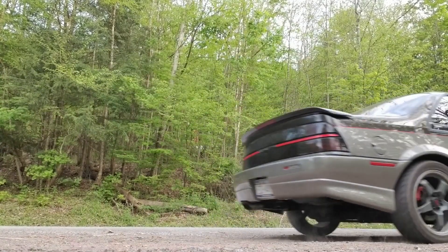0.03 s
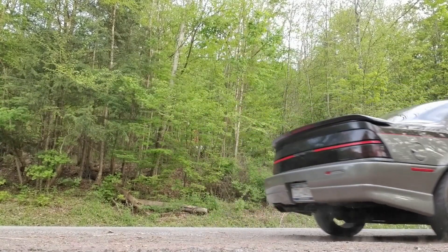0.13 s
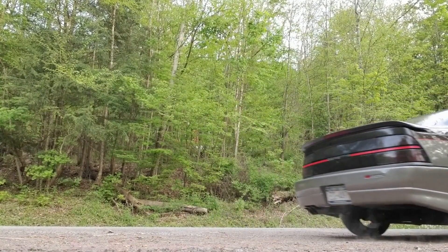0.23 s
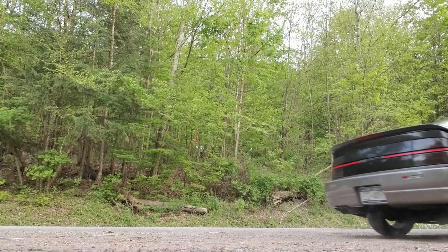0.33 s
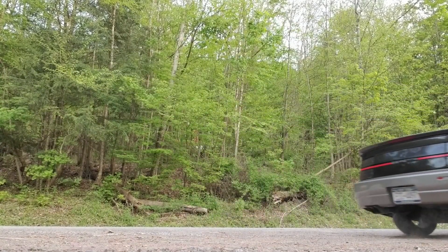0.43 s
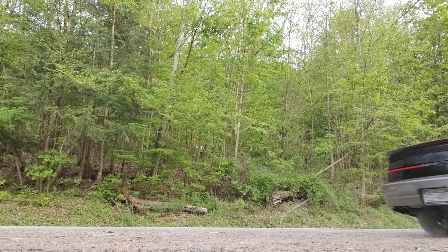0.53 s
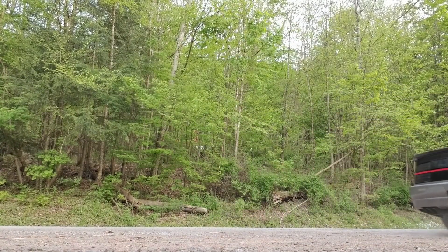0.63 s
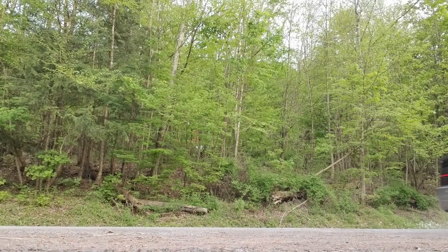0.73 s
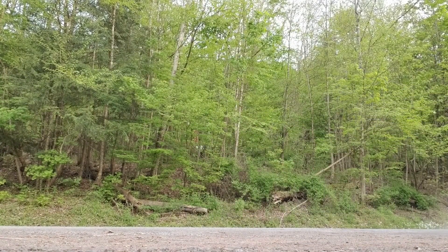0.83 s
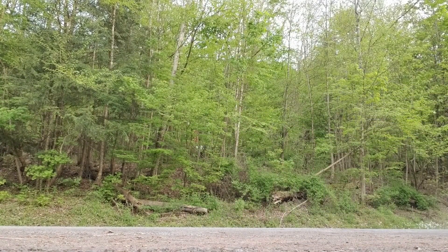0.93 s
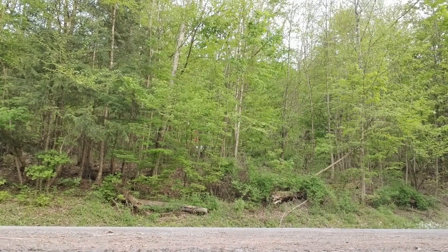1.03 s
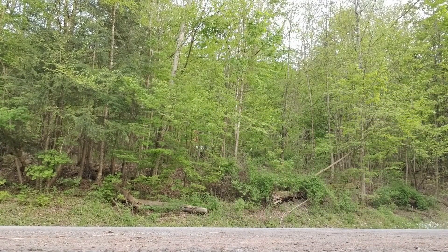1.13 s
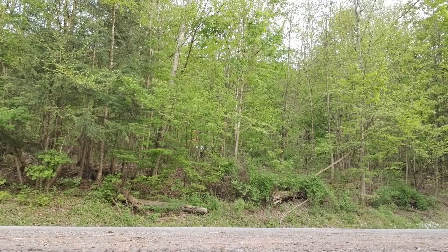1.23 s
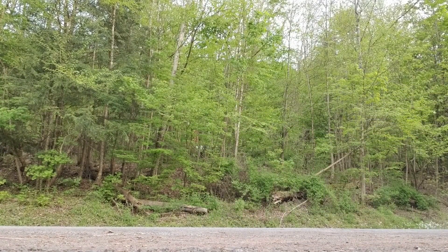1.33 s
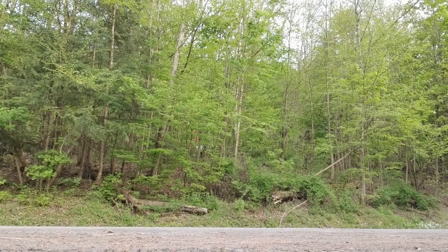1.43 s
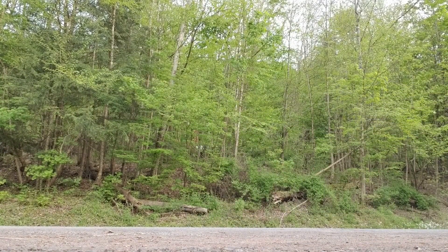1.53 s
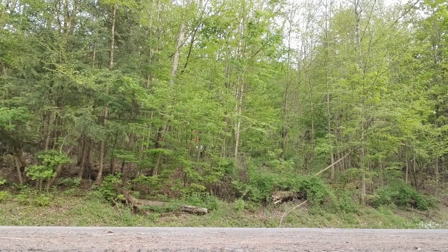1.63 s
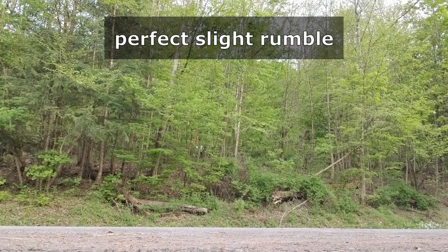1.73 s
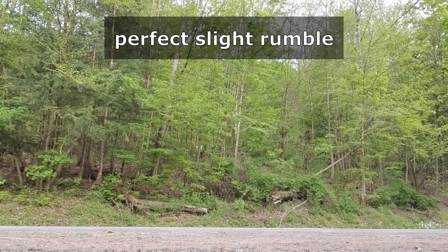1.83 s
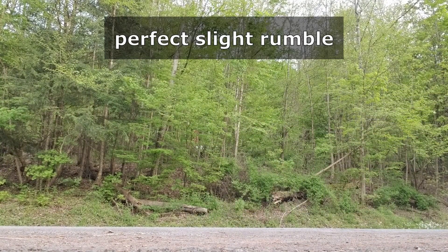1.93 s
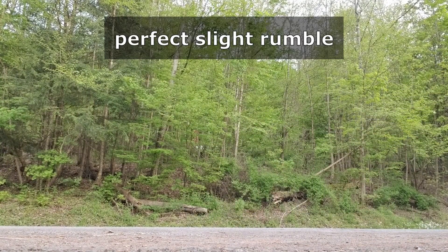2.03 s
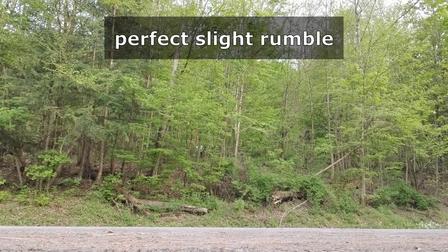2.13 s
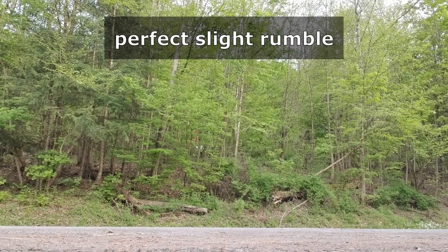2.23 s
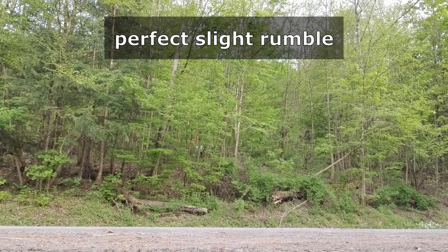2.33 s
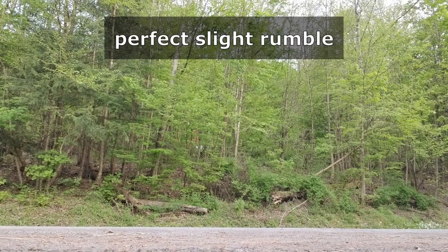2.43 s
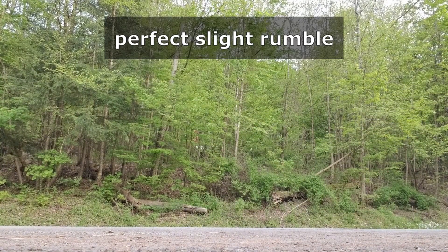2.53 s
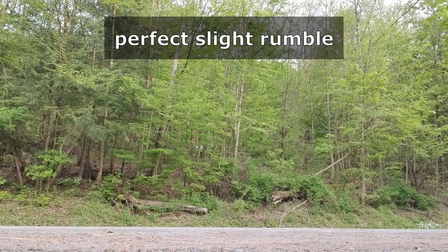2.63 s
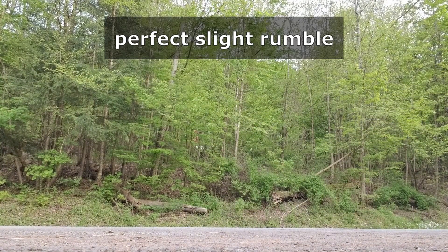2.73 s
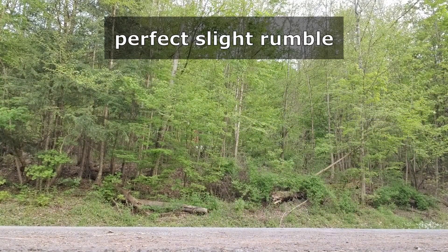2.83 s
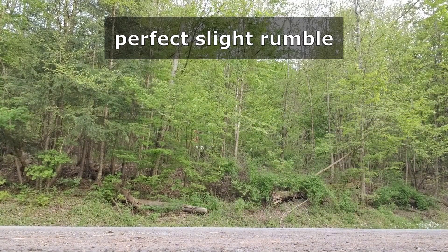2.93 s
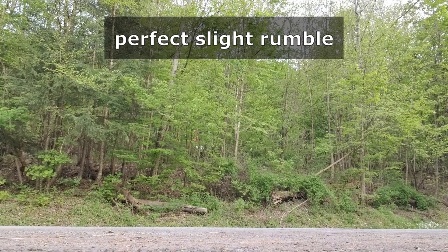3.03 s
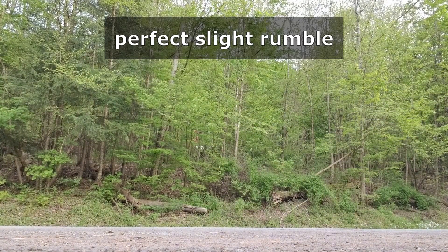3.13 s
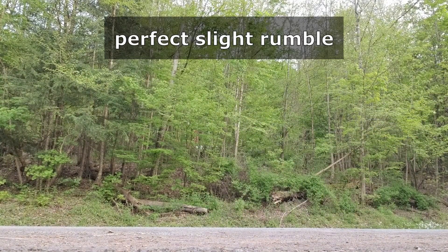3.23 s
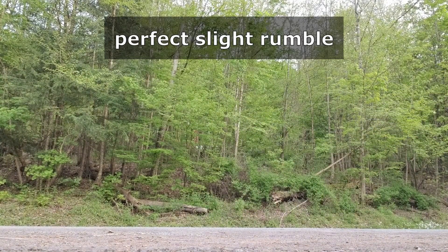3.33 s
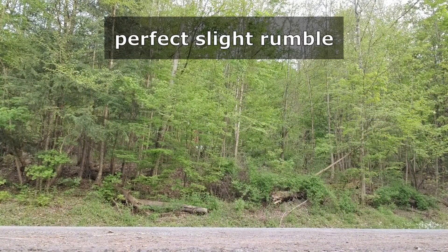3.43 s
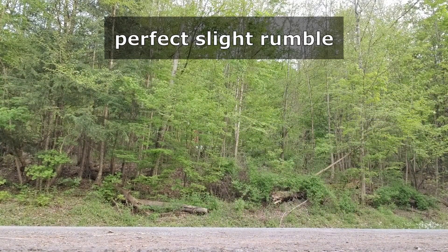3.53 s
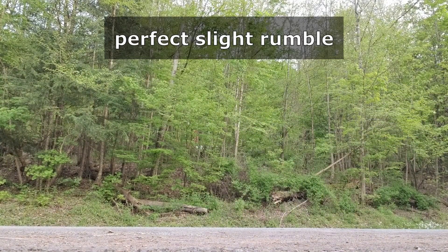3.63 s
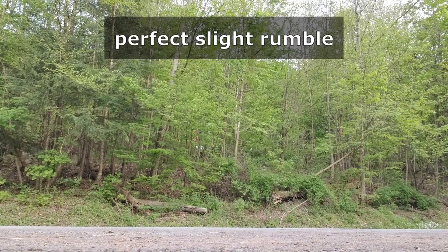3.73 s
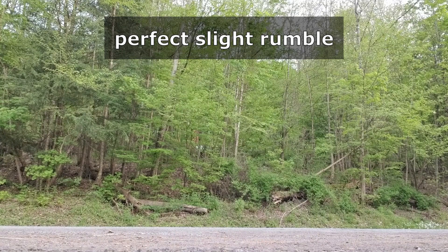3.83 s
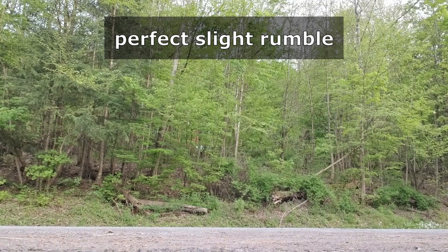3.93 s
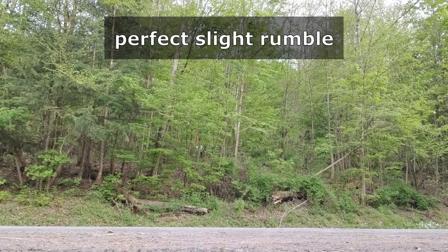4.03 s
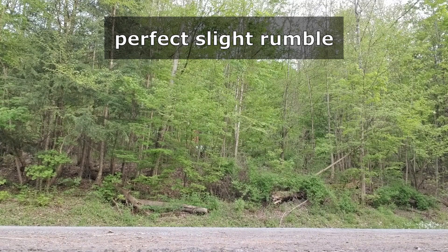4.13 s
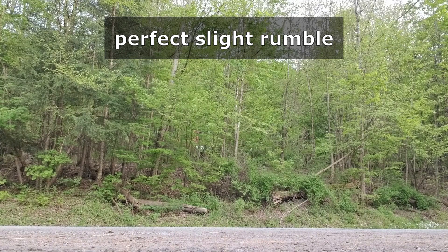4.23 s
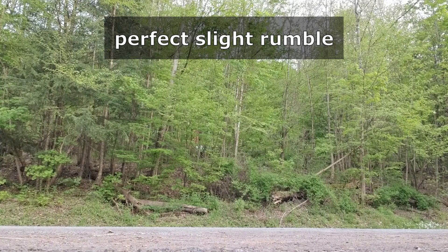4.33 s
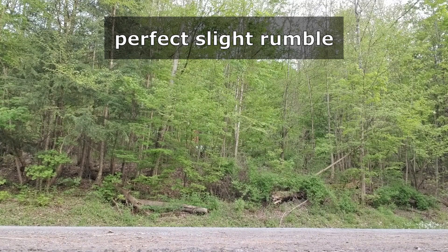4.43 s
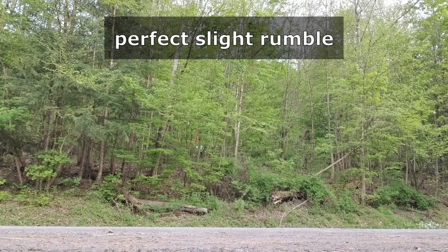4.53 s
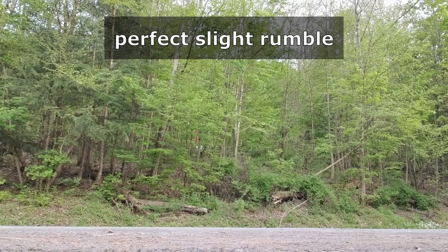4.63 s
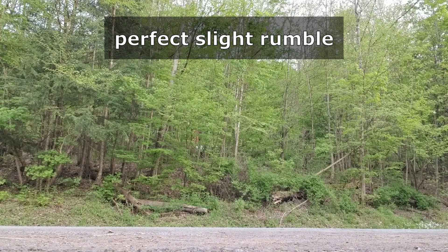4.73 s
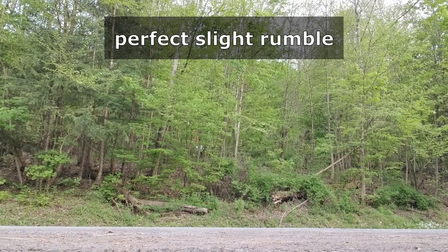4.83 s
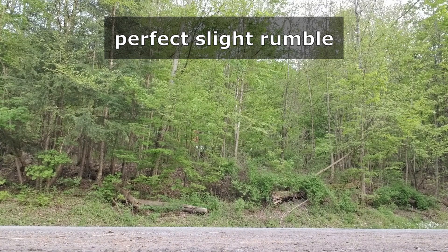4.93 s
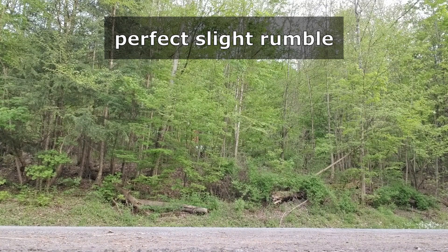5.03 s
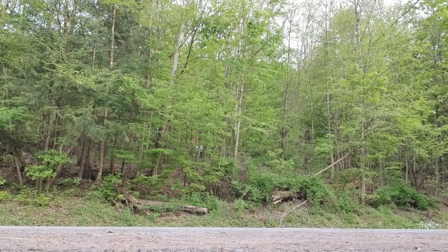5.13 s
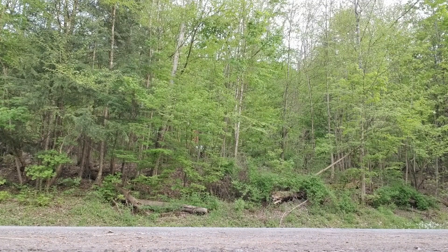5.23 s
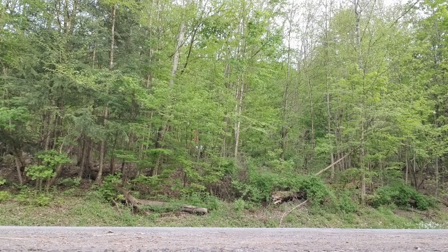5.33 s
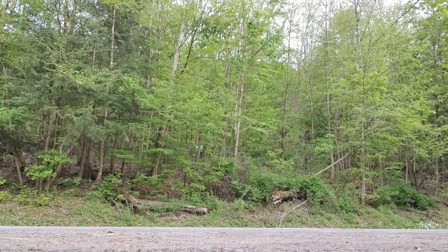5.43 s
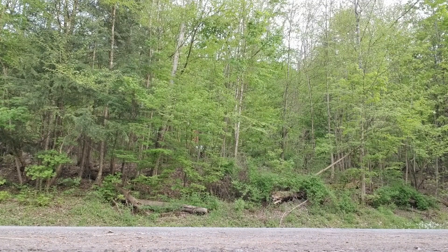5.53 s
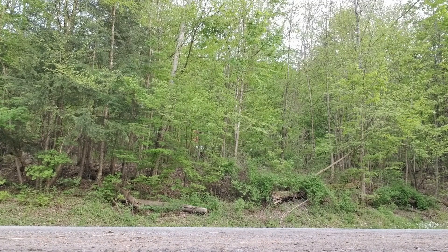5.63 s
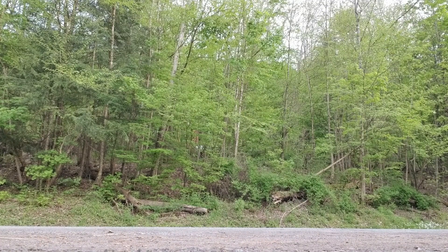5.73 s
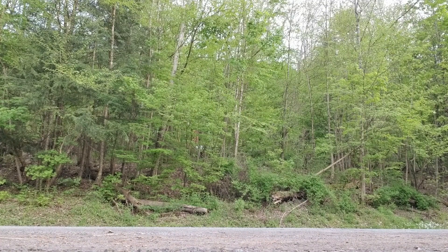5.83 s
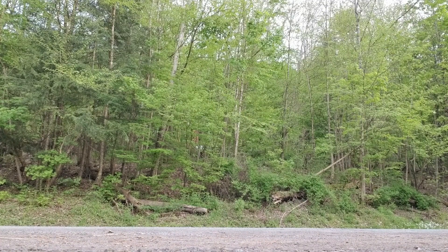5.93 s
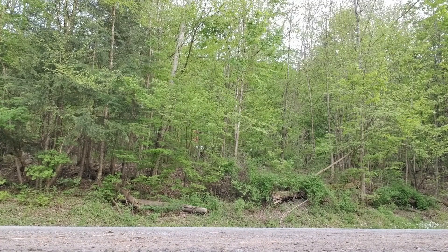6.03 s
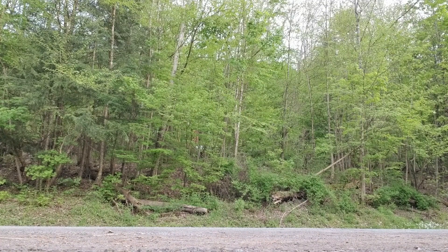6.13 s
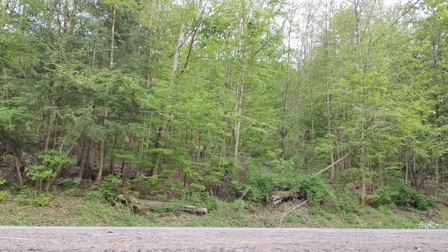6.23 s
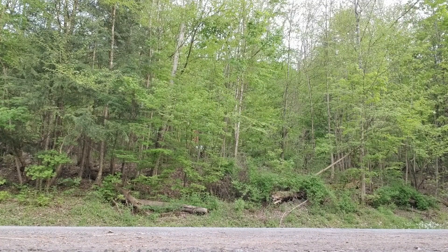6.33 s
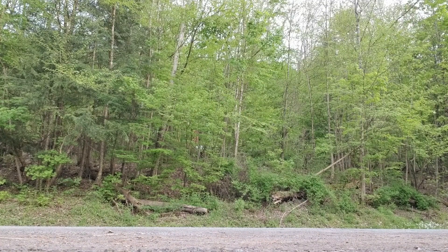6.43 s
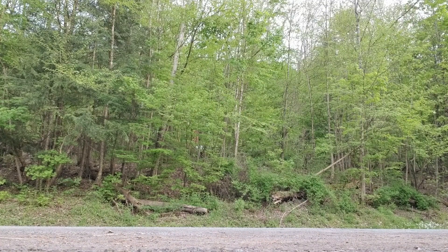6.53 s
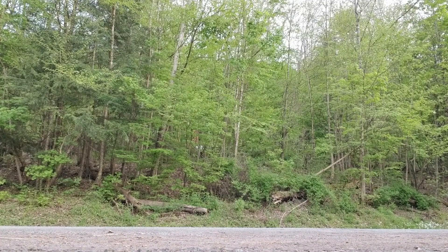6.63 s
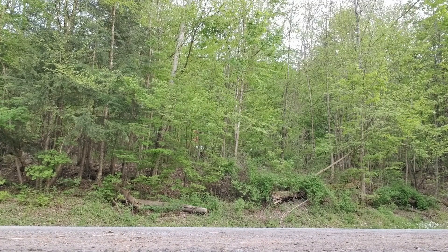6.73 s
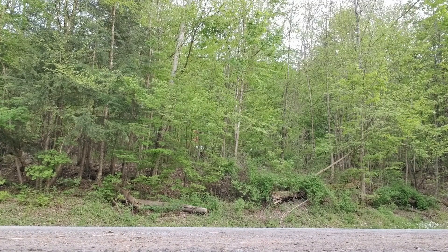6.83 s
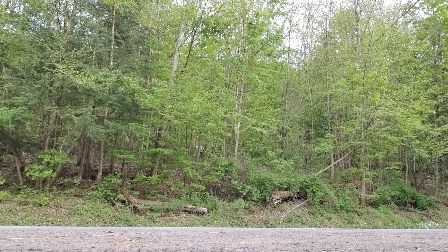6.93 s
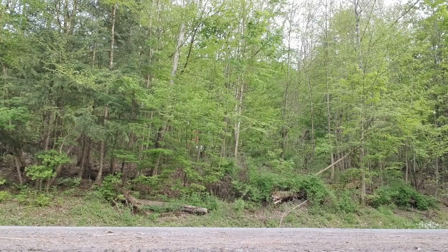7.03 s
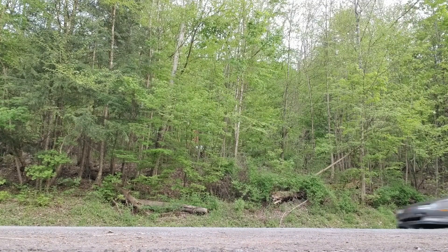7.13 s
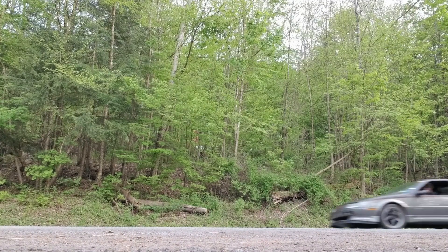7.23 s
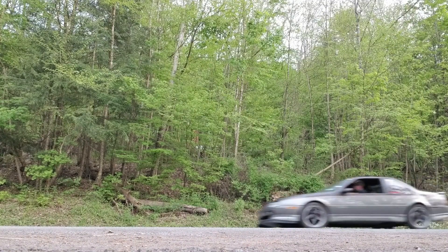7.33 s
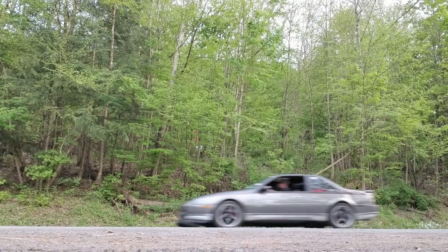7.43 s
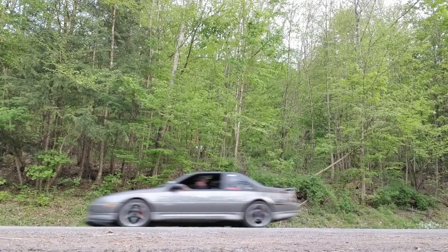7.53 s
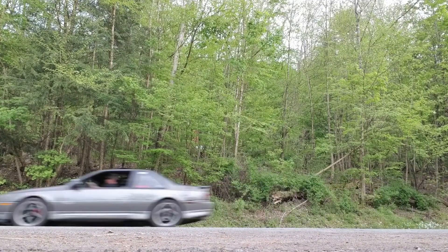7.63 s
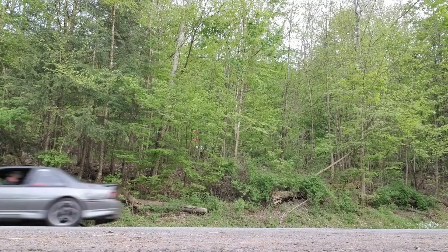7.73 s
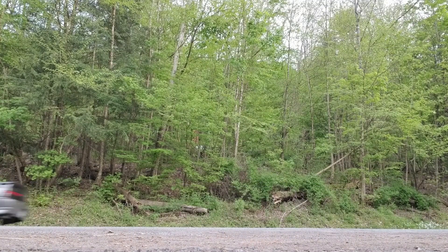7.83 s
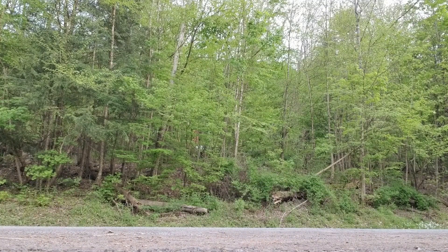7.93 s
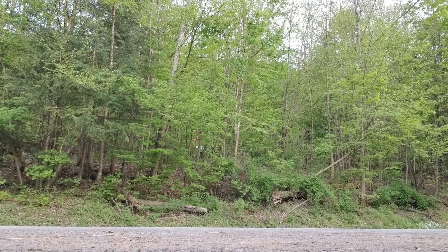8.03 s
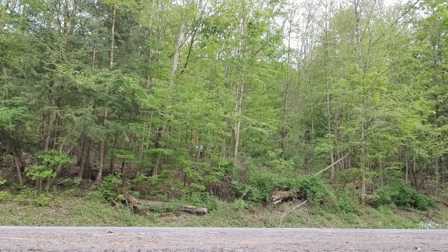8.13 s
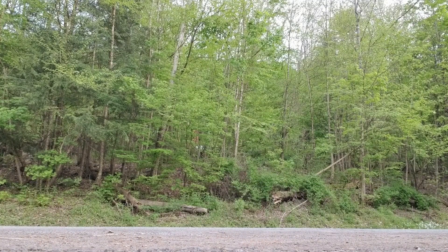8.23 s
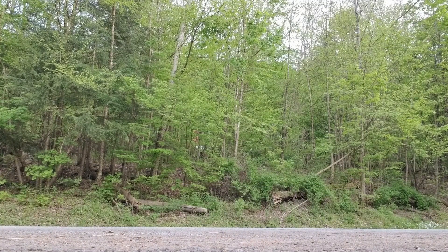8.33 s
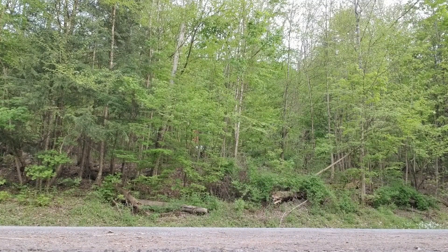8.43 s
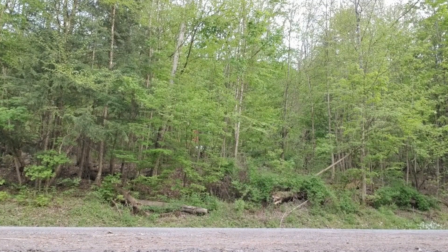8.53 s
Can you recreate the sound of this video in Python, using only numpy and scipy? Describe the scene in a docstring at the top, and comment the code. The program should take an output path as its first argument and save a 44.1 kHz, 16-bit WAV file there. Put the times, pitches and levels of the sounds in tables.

```python
"""Beside a wooded road, a V6 car with a loud exhaust pulls away, shifts up and recedes.
After an abrupt cut it approaches through another gear change and drives past.
Engine orders are cosines swept through muffler and pipe resonances; puffs of gas pulse the rumble.
Shaped noise gives tyre roar, hiss, jet, fizz and a faint high hiss; a fluttering cosine gives the squeal.
Two spaced microphone ports place the passing car, from left to right, by arrival time."""
import sys
import numpy as np
from scipy import signal
from scipy.fft import rfft, irfft, next_fast_len
from scipy.io import wavfile
from scipy.ndimage import uniform_filter1d, map_coordinates

SR = 44100
rng = np.random.default_rng(int(sys.argv[2]) if len(sys.argv) > 2 else 0)


def to_wav(sig):
    """Store sig (one row per channel, or 1-D mono) as 16-bit WAV at the path in sys.argv[1].

    Samples outside -1..1 are clipped; the rate is SR.
    """
    pcm = np.clip(np.atleast_2d(sig), -1, 1) * 32767
    pcm = np.round(pcm).astype(np.int16)
    wavfile.write(sys.argv[1], SR, pcm.T)  # frames by channels


N = 379255
TIME = np.arange(N) / SR
CUT_S = 5.136  # the first drive gives way to the second


def gain_of(db):
    """Decibels to amplitude."""
    return 10 ** (np.asarray(db) / 20)


def curve(table):
    """The value of a timed table at every sample."""
    s, value = np.transpose(table)
    return np.interp(TIME, s, value)


def read(points, hz):
    """A spectrum's value at hz, on a log-frequency axis."""
    f, value = np.transpose(points)
    return np.interp(np.log(hz + 1), np.log(f), value)


def swell(s, half_s, db):
    """A bell-shaped rise in dB around one moment."""
    return db * np.exp(-((TIME - s) / half_s) ** 2)


def cut(before, after):
    """The first drive up to the cut, then the second, joined by a very short crossfade."""
    first = uniform_filter1d((TIME < CUT_S) * 1., size=120)
    return first * before + (1 - first) * after


def wander(rate_hz):
    """Smooth random movement of rms 1, fading out above about rate_hz."""
    size = next_fast_len(N)
    hz = np.fft.rfftfreq(size, 1 / SR)
    x = irfft(rfft(rng.standard_normal(size)) * np.exp(-(hz / rate_hz) ** 2), size)[:N]
    return x / x.std()


def delayed(x, lag_s):
    """The sound x, late by a moving lag."""
    return map_coordinates(x, [np.arange(N) - lag_s * SR], order=3, mode="nearest")


# likeness of the two ports: [frequency_hz, likeness (0-1)]
PORT_LIKENESS = [(150, 0.94), (700, 0.99), (1100, 0.97), (2100, 0.84), (3000, 0.67), (4500, 0.13)]


def noise(spectrum, right_db):
    """Noise shaped in dB per Hz, alike at both ports in the bass and mostly unrelated in the treble."""
    size = next_fast_len(N)
    hz = np.fft.rfftfreq(size, 1 / SR)
    left, other = rfft(rng.standard_normal((2, size))) * np.sqrt(SR / 2)  # 0 dB per Hz
    same = np.clip(read(PORT_LIKENESS, hz), 0, 1)
    right = gain_of(right_db) * (same * left + np.sqrt(1 - same ** 2) * other)
    return irfft(np.array([left, right]) * gain_of(read(spectrum, hz)), size)[:, :N]


# each drive past the microphone: (level_with_mic_s, road_speed_m_per_s, lane_distance_m)
DRIVE_AWAY = (-0.94, 3.43, 4.29)
DRIVE_PAST = (7.442, 17.8, 6.7)


def place(drive, behind_m=0):
    """Distance in lane distances, and bearing from -1 (coming) to 1 (going), of a point on the car."""
    level_s, m_per_s, lane_m = drive
    along = (m_per_s * (TIME - level_s) - behind_m) / lane_m
    distance = np.hypot(1, along)
    return distance, along / distance


# the gear change of each drive: (shut_s, open_s)
GEAR_CHANGE_AWAY = (2.36, 2.95)
GEAR_CHANGE_PAST = (4.9, 5.39)
THROTTLE_S = 0.052  # travel time of the pedal


def throttle_shut():
    """1 while the foot is off the pedal for a gear change, else 0, with a ramp between."""
    changes = (GEAR_CHANGE_AWAY, GEAR_CHANGE_PAST)
    away, past = [np.minimum(TIME - shut_s, open_s - TIME) for shut_s, open_s in changes]
    return np.clip(np.where(TIME < CUT_S, away, past) / THROTTLE_S + .5, 0, 1)


def level(where, db, fall_db, shut_db, behind_db, ahead_db=0):
    """A source's dB at the roadside, from its distance, the throttle and the side of the car that is heard."""
    distance, bearing = where
    beam_db = np.where(bearing > 0, behind_db, ahead_db) * bearing ** 2
    return db - fall_db * np.log10(distance) + shut_db * throttle_shut() + beam_db


# crankshaft speed through first gear, the shift and second gear: [time_s, turns_per_s]
CRANK_AWAY = [(0.0, 33.5), (0.28, 39.3), (0.88, 48.4), (1.4, 55.4), (1.99, 61.4), (2.3, 63.5), (2.61, 62.5),
              (2.72, 59.9), (2.79, 52.7), (2.91, 39.4), (2.99, 36.2), (3.11, 40.6), (3.19, 39.0),
              (4.02, 47.2), (4.51, 51.9), (5.12, 57.3)]
# crankshaft speed as heard from the roadside, through a shift and the pass: [time_s, turns_per_s]
CRANK_PAST = [(5.13, 63.5), (5.3, 59.1), (5.48, 46.4), (5.62, 44.2), (6.5, 48.8), (7.0, 50.8), (7.5, 51.9),
              (8.1, 50.25), (8.6, 50.8)]


def crankshaft():
    """The steady crankshaft speed, and the turns counted at that speed with a slight unsteadiness."""
    speed = cut(curve(CRANK_AWAY), curve(CRANK_PAST))
    turns = np.cumsum(speed * (1 + 0.0025 * wander(rate_hz=12.7))) / SR
    return speed, turns


# bass resonances of the muffler, which the low orders sweep through: [frequency_hz, gain_db]
MUFFLER = [(34, -28), (50, -14), (62, -6.5), (76, -1.8), (97, -9), (125, -5), (155, -1), (190, -12),
           (262, -8), (288, 1), (320, -5.5)]
# standing waves of the exhaust pipe, which the overtones sweep through: [frequency_hz, gain_db]
PIPE_WAVES = [(110, -28), (155, -0.5), (210, -14), (255, -12.5), (290, -1), (370, -13), (440, -4),
              (480, 1.5), (550, -14), (800, -11)]
# load on the engine, which moves the whole exhaust note: [time_s, gain_db]
ENGINE_LOAD = [(0.0, -3.5), (0.25, -1), (0.7, -3), (1.3, -0.5), (2.2, -0.5), (3.0, -3.0), (3.65, 2.0),
               (4.4, -2.5), (5.13, -0.6), (5.3, -2.5), (5.5, -6), (6.2, 0.3)]
# the drone of the overtones swells briefly: [time_s, half_length_s, rise_db]
OVERTONE_SWELLS = [(0.55, 0.21, 5.5), (1.4, 0.28, 3.5), (4.74, .19, 5), (8.07, 0.21, 6.5)]
TAILPIPE_M = 1.4  # behind the middle of the car


def exhaust_note(speed, turns, drive, note, low_orders, overtones, rough, smear_rad, spread_rad):
    """Low orders and overtones that swell as they cross the resonances of muffler and pipe."""
    def angle(k):
        """Phase of order k: the muffler spreads out the bass of each pulse and leaves its edge sharp."""
        return 2 * np.pi * np.round(2 * k) / 2 * turns - spread_rad * min(k, 7) ** 2

    tailpipe = place(drive, TAILPIPE_M)
    *low_db, overtone_db = [level(tailpipe, *row) for row in note.values()]
    overtone_db = overtone_db + sum(swell(*row) for row in OVERTONE_SWELLS)
    out = np.zeros(N)
    for k, db in zip(low_orders, low_db):
        out += gain_of(db + read(MUFFLER, k * speed)) * np.cos(angle(k))
    for k, db in overtones:
        # echoes from the trees let each overtone's phase drift
        drift = smear_rad * wander(rate_hz=6.5)
        out += gain_of(overtone_db + db + read(PIPE_WAVES, k * speed)) * np.cos(angle(k) + drift)
    # no two firings are equally strong
    uneven = 1 + rough * wander(rate_hz=60)
    return np.sqrt(2) * gain_of(curve(ENGINE_LOAD)) * out * uneven


# exhaust note beside the car, before resonances, load and swells; one row per order, then the overtones
# pulling away: [level_db, fall_db_per_tenfold_distance, throttle_shut_db, from_behind_db]
ORDERS_AWAY = {"order 1": (-18, 20.5, 10.5, -4), "order 2": (-7, 20, -9, -9.5),
               "firing order 3": (-3.5, 23, -7, -5.5), "overtones": (-30.5, 27, -3, 0.5)}
# driving past: [level_db, fall_db_per_tenfold_distance, throttle_shut_db, from_behind_db, from_ahead_db]
ORDERS_PAST = {"one bank's order 1.5": (-16, 9, 15.5, -8, -18.5), "firing order 3": (-14, 30, -1, 7, 3.1),
               "order 6": (-21, 29.5, -22, 6, 8), "overtones": (-36.5, 26.5, -33, 11.5, 5.5)}
# overtones left by unequal cylinders: [multiple_of_crankshaft_speed, relative_db]
UNEQUAL_AWAY = [(3.5, -11.5), (4.0, 12.5), (5.0, 7.5), (6.0, 9.5), (7.0, 0.0), (8.0, 6.5), (9.0, 1.5),
                (10.0, 3), (11.0, -8.5), (12.0, -0.5), (13.0, -6.5)]
UNEQUAL_PAST = [(2, -8), (4, -5), (4.5, 5), (5, -8), (7, 3), (7.5, -3), (8, -6), (8.5, -4), (9, 10),
                (9.5, -4), (12, -5)]


def exhaust(speed, turns):
    """Crankshaft orders lead as the car pulls away; one bank's half orders join in as it drives past."""
    rasp = [(k, -14) for k in range(14, 24)]  # the sharp edge of each pulse, in high orders
    leaving = exhaust_note(speed, turns, DRIVE_AWAY, ORDERS_AWAY, (1, 2, 3), [*UNEQUAL_AWAY, *rasp],
                           rough=0.14, smear_rad=0.5, spread_rad=0.85)
    passing = exhaust_note(speed, turns, DRIVE_PAST, ORDERS_PAST, (1.5, 3, 6), UNEQUAL_PAST,
                           rough=0.13, smear_rad=0.51, spread_rad=0.3076)
    return cut(leaving, passing)


# noises beside the car, before their spectra and swells; one row per noise
# pulling away: [level_db_per_hz, fall_db_per_tenfold_distance, throttle_shut_db, from_behind_db]
NOISE_LEVELS_AWAY = {"rumble": (-45.5, 25.5, -3, 2), "tyres": (-57.5, 3, 1.1, -17.5),
                     "jet": (-78, 19, 6, -8), "fizz": (-74, 30, -1, -23)}
# driving past: [level_db_per_hz, fall_db_per_tenfold_distance, throttle_shut_db, from_behind_db, from_ahead_db]
NOISE_LEVELS_PAST = {"rumble": (-56.5, 17, -4, 1, 6.5), "tyres": (-47.5, 25, -0.5, -1, 2),
                     "jet": (-69, 35.5, 5, 12.5, -16), "fizz": (-79, 57, -5, -4, 7)}


def noise_gain(name):
    """Amplitude of one noise as the car moves through both drives."""
    away_db = level(place(DRIVE_AWAY), *NOISE_LEVELS_AWAY[name])
    past_db = level(place(DRIVE_PAST), *NOISE_LEVELS_PAST[name])
    return gain_of(cut(away_db, past_db))


def puffs(turns, firing, lope):
    """Gas leaves in one puff a firing, three a turn, one of them stronger than the others."""
    gate = np.exp(firing * np.cos(2 * np.pi * 3 * turns) + lope * np.cos(2 * np.pi * turns))
    return gate / np.sqrt(np.mean(gate ** 2))


# spectrum of the exhaust rumble: [frequency_hz, gain_db]
RUMBLE_SPECTRUM = [(25.0, -21), (70.0, -9), (150.0, 0.5), (215.0, -13.5), (290.0, -1.5), (380.0, -14.5),
                   (480.0, -3.0), (700.0, -14.5), (1500.0, -21.5), (4000.0, -58), (16000.0, -68.5)]


def rumble(turns):
    """Low exhaust noise that pulses with the puffs of gas."""
    return noise_gain("rumble") * noise(RUMBLE_SPECTRUM, right_db=0.1) * puffs(turns, firing=0.12, lope=0.22)


def road_echo(pair, share, lag_s, nearest_s, passing_s):
    """The road's reflection lags most when the car is nearest, so a comb sweeps down and up again."""
    lag = lag_s / np.hypot(1, (TIME - nearest_s) / passing_s)
    return pair + share * np.array([delayed(x, lag) for x in pair])


# spectrum of the tyre roar: [frequency_hz, gain_db]
TYRE_SPECTRUM = [(25.0, -29.5), (100.0, -9.5), (400.0, -3), (750.0, -4), (1100.0, -1), (1500.0, -3.5),
                 (2000.0, -6.5), (3000.0, -35), (4500.0, -42), (7200.0, -36), (8500.0, -53),
                 (16000.0, -54.5)]


def tyres():
    """Tyre roar as shaped noise, heard together with its reflection off the road."""
    roar = noise_gain("tyres") * noise(TYRE_SPECTRUM, right_db=-0.56)
    return road_echo(roar, share=0.56, lag_s=0.00033, nearest_s=7.5, passing_s=0.3)


# spectrum of the hiss: [frequency_hz, gain_db]
HISS_SPECTRUM = [(700.0, -34), (1600.0, -5), (2300.0, 0), (3200.0, -8), (4500.0, -18.5), (7200.0, -18.5),
                 (8400.0, -30), (11000.0, -25), (16000.0, -39)]
# level of the hiss before its lift, pulling away: [time_s, level_db]
HISS_LEVEL_AWAY = [(0.0, -49), (0.08, -48.5), (1.02, -48.5), (1.6, -44), (2.68, -44), (3.03, -59),
                   (3.85, -53.5), (5.1, -63.5)]
# the same beside the car, driving past:
# (level_db, fall_db_per_tenfold_distance, throttle_shut_db, from_behind_db, from_ahead_db)
HISS_LEVEL_PAST = (-40.5, 31, 1, 10.5, 15.5)
HISS_LIFT_DB = 3.5


def hiss(turns):
    """Mid-treble noise, gently pulsed by the puffs and evened to rms 1 before its level is set."""
    breath = noise(HISS_SPECTRUM, right_db=-0.4) * puffs(turns, firing=0.052, lope=0.04)
    level_db = cut(curve(HISS_LEVEL_AWAY), level(place(DRIVE_PAST), *HISS_LEVEL_PAST))
    return gain_of(HISS_LIFT_DB + level_db) * breath / breath.std()


# spectrum of the jet: [frequency_hz, gain_db]
JET_SPECTRUM = [(1000.0, -6.5), (2400.0, -2.5), (3600.0, -7), (4500.0, -15.5), (7000.0, -20.5),
                (9000.0, -31.5), (16000.0, -29)]
# just after the pass the jet swells briefly: (time_s, half_length_s, rise_db)
JET_RISE = (7.79, 0.24, 4.6)


def jet(turns):
    """Bright noise of the gas jet, pulsed by the puffs, with a lift at the right port."""
    gain = noise_gain("jet") * gain_of(swell(*JET_RISE))
    return gain * noise(JET_SPECTRUM, right_db=10) * puffs(turns, firing=0.16, lope=0.13)


# spectrum of the fizz: [frequency_hz, gain_db]
FIZZ_SPECTRUM = [(3000.0, -22), (7200.0, 1.5), (8600.0, -8), (12000.0, -7), (14500.0, 0), (16000.0, 1.5)]


def fizz():
    """High treble noise that flickers with the grit under the treads."""
    return noise_gain("fizz") * noise(FIZZ_SPECTRUM, right_db=-0.5) * gain_of(2.5 * wander(rate_hz=200))


# loudest chirps of the thin squeal: [time_s, rise_db above the chatter]
SQUEAL_CHIRPS = [(.145, 7), (.36, 4), (.87, 10), (1.15, 11), (1.25, 10), (1.45, 11), (1.79, 11), (1.88, 11),
                 (2.37, 12), (2.49, 15.5), (2.66, 3)]
CHIRP_HALF_S, SQUEAL_END_S, SQUEAL_FADE_S = 0.013, 3.06, 0.3


def squeal(hz, width_hz, db, flutter_db):
    """A narrow, fluttering tone with louder chirps, fading out through the first gear change."""
    on = np.clip((SQUEAL_END_S - TIME) / SQUEAL_FADE_S, 0, 1)
    chirp_db = sum(swell(s, CHIRP_HALF_S, rise_db) for s, rise_db in SQUEAL_CHIRPS)
    angle = 2 * np.pi * np.cumsum(hz + width_hz * wander(rate_hz=59.7)) / SR
    return on * gain_of(db + chirp_db + flutter_db * wander(rate_hz=50)) * np.sqrt(2) * np.cos(angle)


# spectrum of the faint hiss: [frequency_hz, gain_db]
FAINT_HISS_SPECTRUM = [(3500, -1.5), (7000, 0.5), (8300, -14.5)]


def faint_hiss():
    """A faint, steady high hiss beneath the car's noises."""
    return gain_of(-94.5) * noise(FAINT_HISS_SPECTRUM, right_db=0.5)


PORT_LAG_S = 0.00046  # between the ports, for a sound from far down the road


def across_ports(car):
    """Shift the right port in time: the car leaves to the left, then comes from the left and goes right."""
    _, going = place(DRIVE_AWAY)
    _, coming = place(DRIVE_PAST)
    return np.array([car[0], delayed(car[1], PORT_LAG_S * cut(going, -coming))])


def scene():
    """The car's exhaust note and noises placed across the ports, with the squeal and the faint hiss."""
    speed, turns = crankshaft()
    car = exhaust(speed, turns) + rumble(turns) + tyres() + hiss(turns) + jet(turns) + fizz()
    ports = across_ports(car)
    ports += squeal(hz=1880, width_hz=20, db=-50, flutter_db=3.8)
    return ports + faint_hiss()


# the right port's colour, mostly duller than the left: [frequency_hz, gain_db]
RIGHT_COLOUR = [(100.0, -2.5), (500.0, -3), (900.0, 0.66), (2300.0, -3.5), (4200.0, -1.5), (6200.0, -5.5),
                (7400.0, -23), (9000.0, -18), (12000.0, -13), (16000.0, -14)]
LOW_CUT_HZ, EDGE_HZ = 42, 15850


def record(dry):
    """The colour of the right port, the microphone's low cut, then the band limit."""
    size = next_fast_len(N + SR)
    hz = np.fft.rfftfreq(size, 1 / SR)
    ports = np.array([np.ones(len(hz)), gain_of(read(RIGHT_COLOUR, hz))])
    low_cut = 1 / np.hypot(1, (LOW_CUT_HZ / (hz + 1)) ** 4)
    heard = irfft(rfft(dry, size) * ports * low_cut, size)[:, :N]
    edge = signal.firwin(511, EDGE_HZ, window=("kaiser", 9), fs=SR)
    return signal.oaconvolve(heard, edge[None], "same", axes=1)


dry = scene()
out = record(dry)
to_wav(out)
```